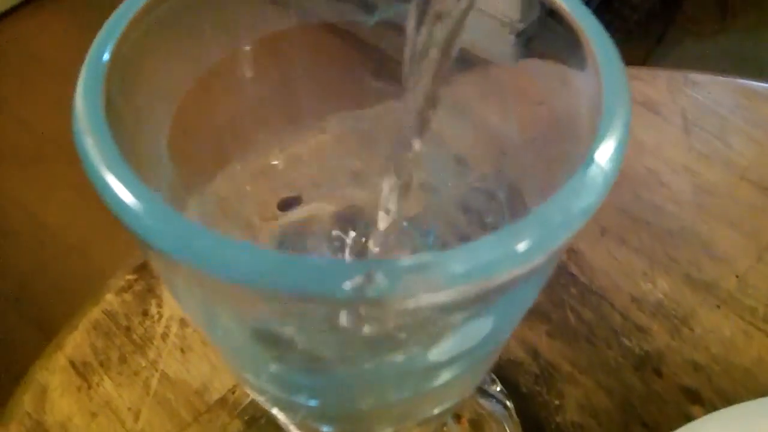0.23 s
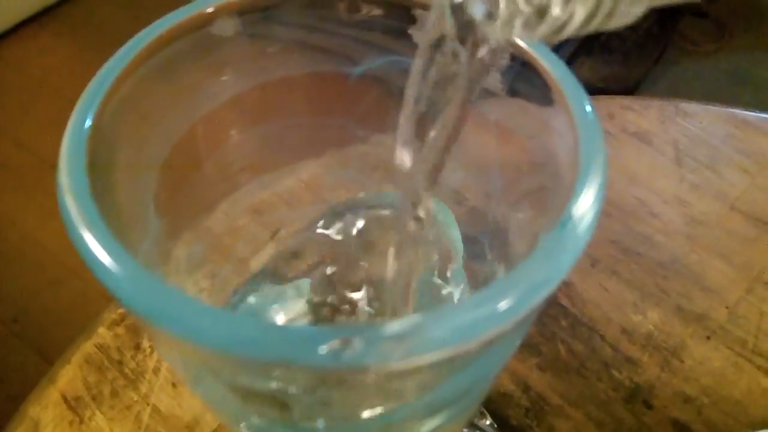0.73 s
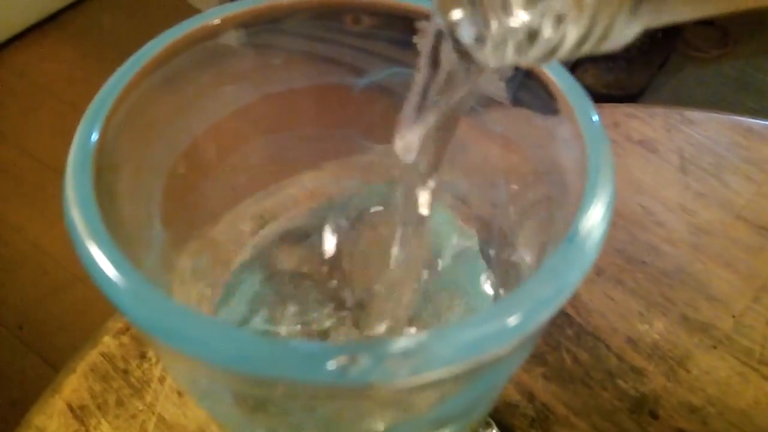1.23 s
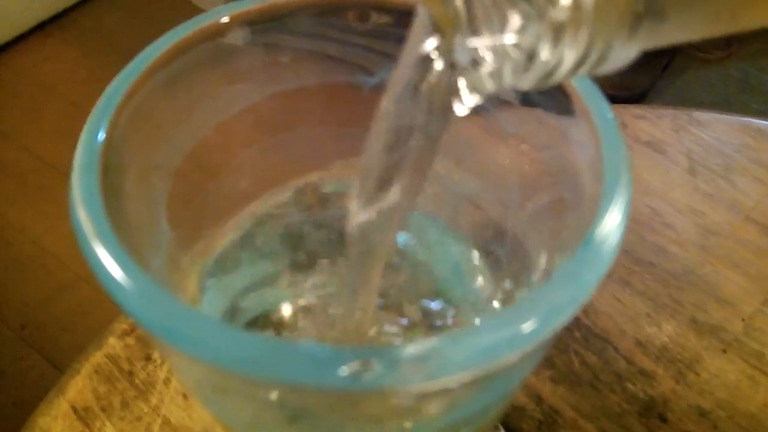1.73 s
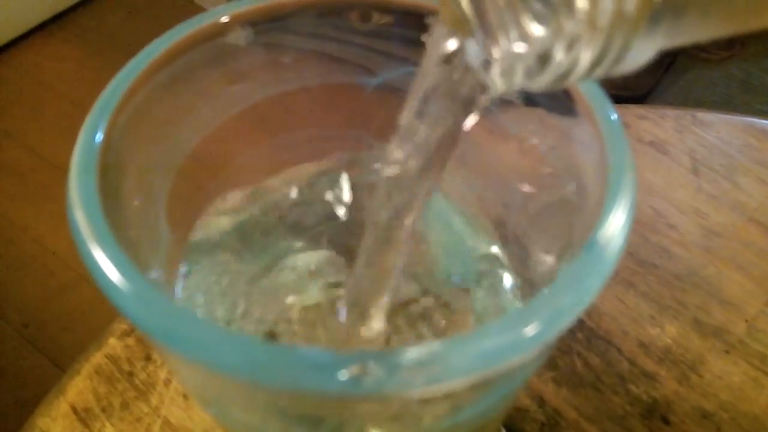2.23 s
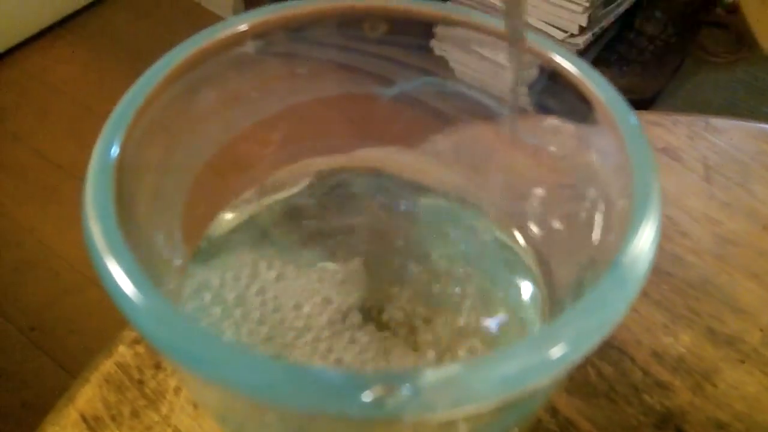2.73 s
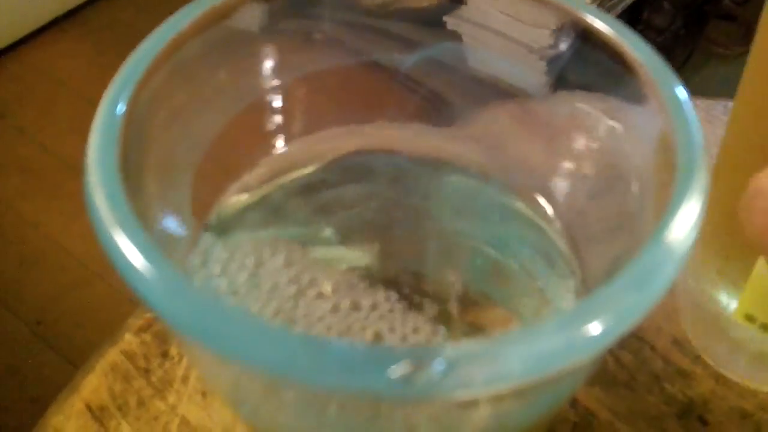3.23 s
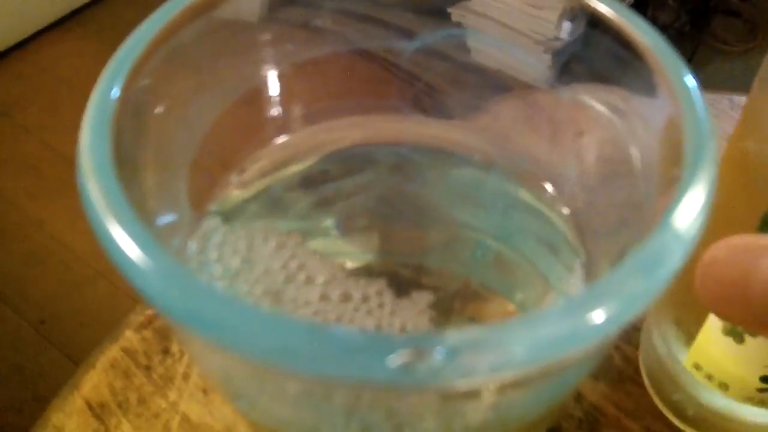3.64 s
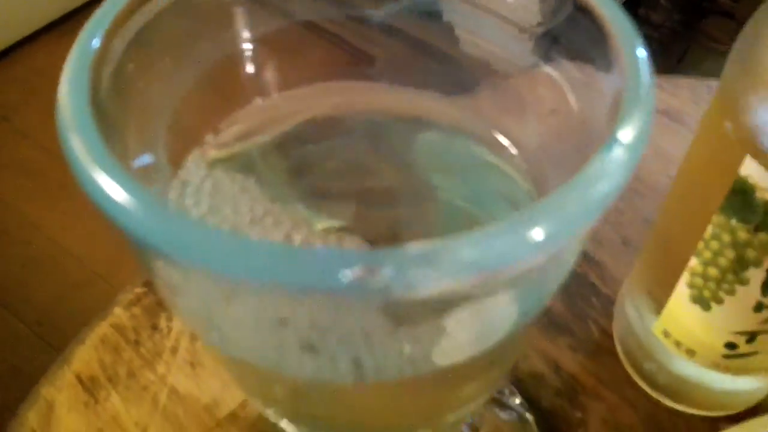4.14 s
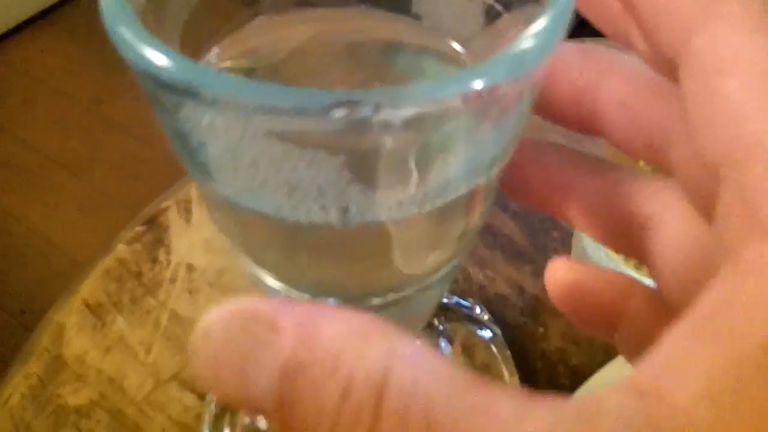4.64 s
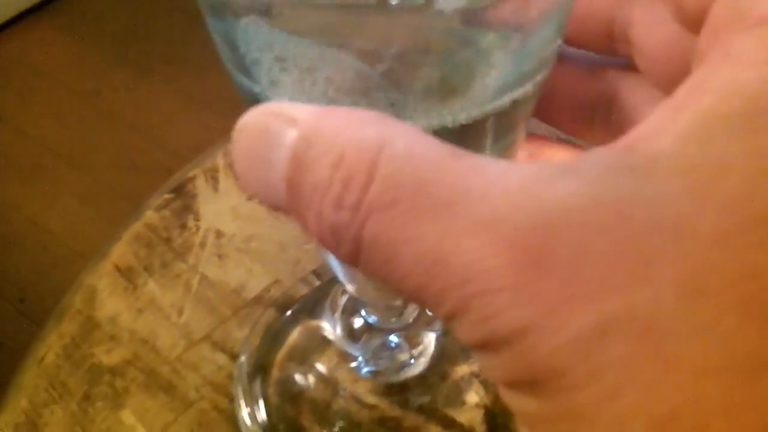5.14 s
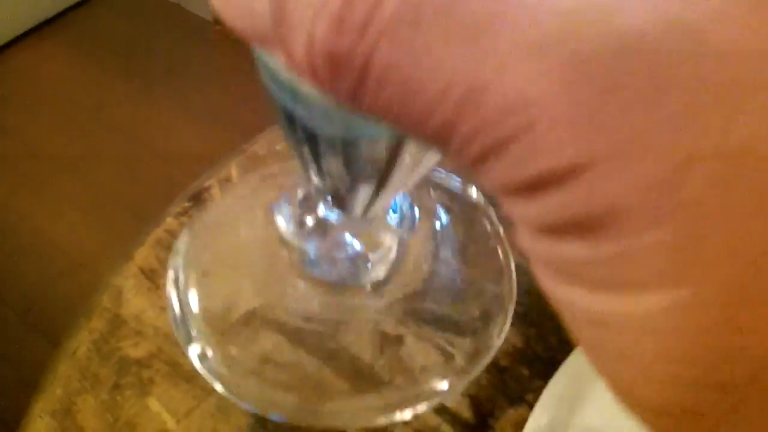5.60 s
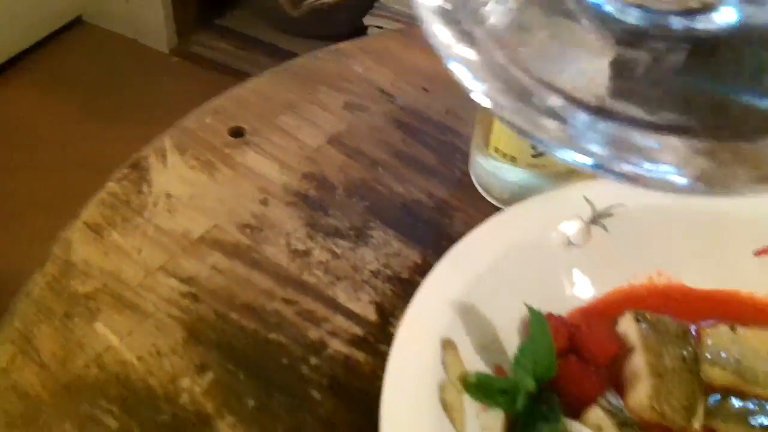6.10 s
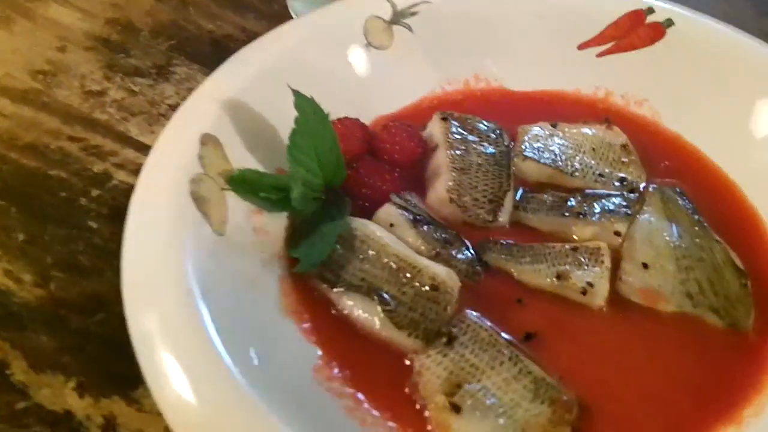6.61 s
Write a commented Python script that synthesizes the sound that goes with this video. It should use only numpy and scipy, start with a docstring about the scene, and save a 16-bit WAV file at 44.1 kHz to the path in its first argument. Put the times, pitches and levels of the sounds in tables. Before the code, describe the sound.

Wine glugs quickly from a bottle into a thick glass, bubbling and splashing close by, then the bottle knocks down on a wooden table.

```python
"""Air gulps up a bottle neck and bubbles plop and fizz as wine is poured into a thick stem glass, close by.
Plunges ring as gliding sines; fizz is random bubbles; both excite the bowl's air modes, and the deepest plunges
also ring the table under the stem. Gulps are rising tones in the neck, most begun by a pop; spray is short
bands of noise, small sounds are brief rings. Knocks ring the modes of a wooden table: the bottle is set down, a
hand takes the glass. Steady noise lies beneath."""
import sys
import numpy as np
from scipy import signal
from scipy.fft import rfft, irfft
from scipy.io import wavfile
from scipy.ndimage import uniform_filter1d

SR = 44100
rng = np.random.default_rng(int(sys.argv[2]) if len(sys.argv) > 2 else 0)


def transcribe(signal):
    """Save signal, clipped to [-1, 1], as a 16-bit WAV file at the path in sys.argv[1]."""
    frames = np.atleast_2d(signal).T
    limited = np.clip(frames, -1, 1)
    pcm = np.round(limited * 32767).astype(np.int16)
    wavfile.write(sys.argv[1], SR, pcm)


N = 302614


def gain_of(db):
    """Decibels to amplitude."""
    return 10 ** (np.asarray(db) / 20)


def evened(x):
    """Scales to rms 1."""
    return x / np.sqrt(np.mean(x ** 2) + 1e-20)


def smoothed_noise(length, width_samples):
    """Slow random curve of rms 1: white noise averaged twice."""
    once = uniform_filter1d(rng.standard_normal(length), size=width_samples)
    return evened(uniform_filter1d(once, size=width_samples))


def curve(rows):
    """Interpolates the columns of a time table at every sample."""
    time_s, *columns = np.transpose(rows)
    return [np.interp(np.arange(N) / SR, time_s, column) for column in columns]


def colour(x, points):
    """Filters by a spectrum of (f/Hz, gain/dB), interpolated over log frequency."""
    point_hz, point_db = np.transpose(points)
    hz = np.fft.rfftfreq(N, 1 / SR)
    gain_db = np.interp(np.log(hz + 1), np.log(point_hz), point_db)
    return irfft(rfft(x) * gain_of(gain_db), N)


def add(mix, start_s, sound):
    """Mixes a sound in at start_s, cut at the end of the mix."""
    part = mix[max(round(start_s * SR), 0):][:len(sound)]
    part += sound[:len(part)]


def ring(hz, t60_s, glide=0., rise_s=0.0001):
    """A dying sine; glide is the mean pitch rise over t60 as a share (twice that at t60)."""
    t = np.arange(round(min(t60_s, 1.5) * SR) + 9) / SR
    envelope = gain_of(-60 * t / t60_s) * (1 - np.exp(-t / rise_s))
    return envelope * np.sin(2 * np.pi * hz * t * (1 + glide * t / t60_s))


def puff(t60_s, rise_s=0.0001):
    """A dying burst of white noise."""
    t = np.arange(6000) / SR
    return rng.standard_normal(6000) * gain_of(-60 * t / t60_s) * (1 - np.exp(-t / rise_s))


def resonate(x, hz, width_hz):
    """Resonance of gain 1 at a pitch that may move: shift down to zero, smooth, shift back."""
    turn = np.exp(2j * np.pi * np.cumsum(hz * np.ones(len(x))) / SR)
    pole = np.exp(-np.pi * width_hz / SR)
    smooth = signal.lfilter([1 - pole], [1, -pole], x / turn)
    return 2 * (turn * smooth).real


# churn of the stream in the bowl: t/s, level/dB
STREAM_CHURN = [(0.0, -89), (0.14, -52.5), (0.28, -49.5), (0.44, -47), (0.99, -41.5), (1.14, -53.5),
                (1.23, -49), (1.29, -40), (1.4, -50), (1.5, -48.5), (2.15, -54.5), (2.41, -68),
                (2.95, -63.5)]
# air modes above the wine: t/s, first f/Hz, second f/Hz, gain of the first/dB
AIR_MODES = [(0, 1172, 2160, -7), (.35, 1210, 1537, 11), (.6, 948, 1216, 20), (.9, 798, 1481, 25),
             (1.2, 816, 1568, 28.5), (1.6, 800, 1600, 20), (2.3, 783, 1830, 17), (2.5, 918, 1780, 22),
             (2.9, 985, 1850, 21.5)]
# table modes under the stem: f/Hz, width/Hz, gain/dB
STEM_MODES = [(441.7, 17, 2.5), (610, 29, -10.5)]


def bowl():
    """Bubbles, splashes and fizz ring the air above the wine; the deepest bubbles also ring the table under the
    glass."""
    slosh_share = 0.033  # rms bend of the air modes by the rocking surface
    wash_db = -14.5      # hiss of bubbles too many to count, against the churn
    tail_db = -22        # share of the bubbles that lingers in the air of the bowl
    second_db = 13.5
    churn_db, = curve(STREAM_CHURN)
    first_hz, second_hz, first_db = curve(AIR_MODES)
    slosh = 1 + slosh_share * smoothed_noise(N, 2500)
    bubbles, splash = plops()

    # each plunge stirs the wine, 19 ms decay constant
    stir = signal.lfilter([1], [1, -np.exp(-1 / (0.019 * SR))], abs(bubbles))
    bursts = 0.2 + 1.5 * stir / (uniform_filter1d(stir, size=9000) + .02)
    births_on = np.arange(N) < 2.9 * SR
    wash = bursts * evened(colour(rng.standard_normal(N), FIZZ_SPECTRUM))
    drive = splash + gain_of(churn_db) * fizz(bursts * births_on)
    drive += gain_of(churn_db + wash_db) * wash

    push = drive + gain_of(tail_db) * bubbles
    air = gain_of(first_db) * resonate(push, first_hz * slosh, 21.4)
    air += gain_of(second_db) * resonate(push, second_hz * slosh, 45)

    # the deepest plunges press on the stem, more as the glass fills
    deep = resonate(resonate(bubbles, 870, 252), 870, 244)
    filling = np.minimum(np.arange(N) / (1.5 * SR), 1)
    thumps = abs(deep) ** 0.56 * filling
    stem = np.zeros(N)
    for hz, width_hz, db in STEM_MODES:
        narrowed = resonate(resonate(thumps, hz, 139), hz, 130)
        stem += gain_of(db) * resonate(narrowed, hz, width_hz)
    return bubbles + drive + air + stem


# plunges of the stream, levels before colouring: t/s, deep bubble level/dB, its f/Hz,
# middle bubble level/dB, its f/Hz, its t60/s, its mean pitch rise/share, small bubble level/dB, its f/Hz
STREAM_PLUNGES = [(0.065, -31.5, 1280, -35, 2290, 0.0078, 0.24, -12, 2820),
                  (0.076, -54, 1320, -47, 1780, 0.014, 0.15, -22.5, 3840),
                  (0.085, -56, 1230, -48, 1990, 0.018, 0.02, -24.5, 3720),
                  (0.09, -58, 1160, -44, 2280, 0.019, 0.25, -18, 3030),
                  (0.1015, -53, 1360, -32, 2060, 0.048, 0.4, -17.5, 3800),
                  (0.198, -61, 1040, -45, 2240, 0.014, 0.3, -34, 3710),
                  (0.2087, -53, 1320, -33, 1870, 0.027, 0.045, -26, 2940),
                  (0.226, -57, 1297, -19, 1770, 0.012, 0.02, -28.5, 5680),
                  (0.234, -51, 1300, -13.5, 2150, 0.0039, 0.02, -32.5, 2450),
                  (0.2852, -32, 1260, -9.5, 2200, 0.0055, 0.23, -13.5, 2930),
                  (0.3119, -20, 1330, -15, 2230, 0.039, 0.06, -14, 3350),
                  (0.3222, -47, 1120, -2.5, 1540, 0.018, 0.026, -23, 2370),
                  (0.351, -21, 1230, -23, 1332, 0.1, 0.024, -17, 3360),
                  (0.365, -16.5, 1130, -21.5, 1844, 0.05, 0.13, -25.5, 3450),
                  (0.373, -42, 1220, -18.5, 1246, 0.025, 0.02, -34, 2320),
                  (0.4126, -48, 1200, -40, 1245, 0.26, 0.034, -20.5, 4210),
                  (0.431, -8, 1264, -13.5, 1312, 0.074, 0.013, -27, 3500),
                  (0.473, -52, 1150, -14.5, 1406, 0.035, 0.022, -30, 2320),
                  (0.485, -59, 1150, -13.5, 1390, 0.027, 0.056, -20.5, 2840),
                  (0.5, -47, 1120, -6.5, 1344, 0.031, 0.013, -46, 4360),
                  (0.518, -33, 1070, -23, 1220, 0.012, 0.02, -9.5, 3090),
                  (0.527, -16, 1136, -40, 1200, 0.065, 0.02, -40, 3700),
                  (0.543, -40, 1140, -6.5, 1194, 0.046, 0.45, -11.5, 2740),
                  (0.565, -11.5, 1060, -5, 1250, 0.014, 0.23, -13.5, 3020),
                  (0.579, -37, 955, -10, 1145, 0.032, 0.087, -31, 2300),
                  (0.595, -16, 910, -7.5, 1330, 0.0076, 0.13, -20, 2950),
                  (0.635, -16, 860, -16, 1440, 0.029, 0.022, -36, 2450),
                  (0.647, -27, 810, -29, 1350, 0.098, 0.02, -38, 2810),
                  (0.675, -31, 910, -24.5, 1526, 0.041, 0.02, -47, 3040),
                  (0.713, -21.5, 1070, -26, 1880, 0.039, 0.059, -22.5, 2950),
                  (0.726, -30, 1030, -22, 1350, 0.028, 0.27, -37, 2930),
                  (0.743, -25, 1080, -17, 1870, 0.0099, 0.02, -32, 2620),
                  (0.749, -20.5, 1110, -14, 1760, 0.013, 0.24, -41, 3910),
                  (0.766, -27, 910, -13.5, 1360, 0.017, 0.27, -28, 3340),
                  (0.774, -45, 860, -34, 2100, 0.01, 0.3, -14.5, 3100),
                  (0.7948, -19, 936, -16, 1230, 0.017, 0.24, -27, 2590),
                  (0.819, -35, 970, -36, 1560, 0.066, 0.02, -25, 3700),
                  (0.826, -24, 936, -23.5, 1320, 0.033, 0.25, -23.5, 2330),
                  (0.847, -38, 960, -28, 1780, 0.013, 0.02, -21.5, 3770),
                  (0.861, -14.5, 912, -13.5, 1703, 0.03, 0.113, -19.5, 2460),
                  (0.87, -26, 854, -45, 1710, 0.057, 0.37, -19.5, 3420),
                  (0.885, -25, 820, -10, 1290, 0.0053, 0.14, -24.5, 2470),
                  (0.9163, -43, 855, -26, 2110, 0.011, 0.02, -20.5, 2890),
                  (0.927, -32.5, 800, -27, 1580, 0.021, 0.02, -25.5, 2720),
                  (0.948, -36, 790, -20, 1470, 0.021, 0.018, -24.5, 4430),
                  (0.984, -21.5, 806, -14, 1340, 0.014, 0.2, -22.5, 3940),
                  (1.03, -10.5, 908, 0, 1527, 0.025, 0.017, -20, 2340),
                  (1.047, -24, 900, -24, 1500, 0.044, 0.061, -43, 2500),
                  (1.0985, -33.5, 850, -30, 1670, 0.092, 0.13, -34, 2300),
                  (1.132, -34, 980, -20.5, 1470, 0.048, 0.072, -37, 2580),
                  (1.155, -42, 794, -22, 1580, 0.049, 0.12, -20, 3720),
                  (1.1982, -25.5, 760, -13.5, 1375, 0.031, 0.012, -23.5, 3730),
                  (1.2812, -14, 897, -1, 1250, 0.0053, 0.21, -28, 3030),
                  (1.298, -20, 807, -21, 1670, 0.013, 0.018, -29.5, 3820),
                  (1.32, -25, 816, -27.5, 1456, 0.029, 0.017, -41, 2490),
                  (1.3704, -48, 784, -49, 1460, 0.061, 0.19, -16.5, 3090),
                  (1.3911, -25, 890, -17.5, 1573, 0.036, 0.02, -25, 3620),
                  (1.402, -30, 844, -31, 1547, 0.077, 0.02, -22.5, 3010),
                  (1.426, -43, 810, -22, 1900, 0.02, 0.02, -36, 2840),
                  (1.435, -49, 840, -31, 1430, 0.078, 0.022, -25.5, 5430),
                  (1.459, -35.5, 880, -24, 1750, 0.024, 0.018, -29, 2430),
                  (1.5, -53, 880, -20, 2160, 0.0047, 0.02, -29, 3280),
                  (1.516, -39, 863, -33, 1614, 0.077, 0.041, -33, 6000),
                  (1.533, -40, 870, -23, 1660, 0.022, 0.19, -33, 4950),
                  (1.556, -45, 900, -30, 1580, 0.021, 0.02, -48, 3370),
                  (1.571, -30, 990, -29, 2300, 0.033, 0.96, -28.5, 2400),
                  (1.5861, -14, 956, -5, 1510, 0.0085, 0.02, -24.5, 2940),
                  (1.604, -24, 835, -10.5, 1600, 0.0051, 0.35, -33, 2320),
                  (1.62, -34, 770, -33, 1840, 0.017, 0.02, -25, 2790),
                  (1.6462, -26.5, 800, -20.5, 1850, 0.018, 0.085, -29.5, 3530),
                  (1.679, -32, 820, -32.5, 1460, 0.037, 0.018, -27, 3270),
                  (1.702, -37, 850, -28.5, 1455, 0.053, 0.02, -48, 3520),
                  (1.7197, -44, 830, -41, 1540, 0.03, 0.043, -27.5, 3740),
                  (1.7277, -39, 820, -27.5, 1560, 0.038, 0.02, -41, 2290),
                  (1.745, -39, 770, -30, 1650, 0.0082, 0.32, -27.5, 2380),
                  (1.762, -46, 775, -24.5, 1800, 0.03, 0.51, -34, 2230),
                  (1.7682, -33, 733, -45, 1980, 0.045, 0.15, -25, 2940),
                  (1.8036, -69, 784, -19.5, 1786, 0.025, 0.016, -26, 5940),
                  (1.829, -48, 770, -50, 1980, 0.011, 0.3, -35, 4120),
                  (1.848, -55, 990, -23.5, 1550, 0.011, 0.19, -31.5, 2340),
                  (1.887, -39, 770, -20, 2190, 0.023, 0.024, -32, 2760),
                  (1.9072, -43, 815, -29, 1820, 0.029, 0.02, -40, 3170),
                  (1.924, -26.5, 810, -18, 1356, 0.033, 0.018, -30, 2450),
                  (1.941, -37, 830, -18.5, 1700, 0.011, 0.14, -52, 2380),
                  (1.9902, -30, 800, -23, 2010, 0.018, 0.02, -29, 2790),
                  (2.008, -39, 770, -48.5, 1800, 0.083, 0.32, -30.5, 5100),
                  (2.039, -39.5, 690, -26.5, 1740, 0.072, 0.18, -38, 4560),
                  (2.083, -42, 870, -37, 1510, 0.039, 0.03, -27.5, 3570),
                  (2.092, -33.5, 770, -12, 1500, 0.0041, 0.17, -29.5, 2400),
                  (2.133, -37, 700, -28.5, 1388, 0.056, 0.046, -26.5, 2590),
                  (2.145, -57, 735, -34, 1895, 0.15, 0.013, -38.5, 2320),
                  (2.159, -37, 696, -40, 1700, 0.046, 0.02, -47, 2300),
                  (2.171, -33, 805, -14, 1700, 0.026, 0.016, -25, 2270),
                  (2.1825, -62, 730, -28.5, 1330, 0.04, 0.29, -38, 2290),
                  (2.184, -31.5, 694, -26.5, 1610, 0.037, 0.02, -26, 2160),
                  (2.2036, -37, 765, -27.5, 1490, 0.035, 0.02, -32.5, 2280),
                  (2.2313, -41, 777, -27, 1850, 0.027, 0.05, -52, 2930),
                  (2.2641, -42, 790, -21, 1970, 0.0084, 0.15, -37, 2450),
                  (2.2953, -44, 810, -26.5, 1760, 0.032, 0.05, -31, 3800),
                  (2.3142, -34, 800, -13, 1950, 0.0052, 0.042, -26, 4280),
                  (2.363, -50, 800, -34, 2320, 0.0083, 0.15, -32.5, 3650),
                  (2.408, -27, 870, -28, 1495, 0.031, 0.02, -24, 2530),
                  (2.498, -31.5, 943, -22.5, 1840, 0.027, 0.014, -27.5, 2440),
                  (2.511, -52, 1000, -32, 1880, 0.03, 0.17, -31, 3900),
                  (2.529, -59, 930, -32, 1840, 0.018, 0.02, -31.5, 2970),
                  (2.58, -41.5, 930, -23, 2190, 0.0072, 0.28, -40, 3880),
                  (2.639, -48, 930, -40, 2300, 0.016, 0.05, -38, 2810),
                  (2.672, -56, 960, -32, 1786, 0.032, 0.02, -29.5, 2750),
                  (2.734, -37.5, 980, -30, 1890, 0.028, 0.02, -27.5, 2600),
                  (2.841, -36, 1180, -23, 1960, 0.023, 0.05, -33, 2970),
                  (2.848, -53, 1190, -33.5, 2410, 0.024, 0.31, -38, 4650),
                  (2.857, -26.5, 1233, -9, 1874, 0.026, 0.012, -40, 2300)]
# spectrum of small bubbles and spray: f/Hz, relative level/dB
FIZZ_SPECTRUM = [(600, -46), (900, -6.5), (1500, 6), (2500, 10.5), (3500, 16.5), (4500, 6.5), (6500, 4),
                 (11000, -21)]


def plops():
    """Each plunge rings a deep, a middle and a small bubble and three strays, and throws a little spray."""
    deep_t60_s = 0.036
    small_cycles, small_glide = 38.2, 0.062  # t60 in cycles; mean pitch rise
    swell_share = 0.025  # rise time of the middle bubble against its t60, within limits
    stray_db, stray_spread_db, stray_top_db = -15, 4.5, -20.5  # top caps the plunge level that strays follow
    stray_cycles, stray_lag_s = 45, 0.01  # t60 in cycles; longest lag
    stray_low_hz, stray_high_hz, stray_glide = 1252, 4487, 0.264  # glide: greatest mean pitch rise
    bubbles, splash = np.zeros(N), np.zeros(N)
    spreads = rng.standard_normal(len(STREAM_PLUNGES))
    stray_draws = rng.random((len(STREAM_PLUNGES), 3, 4))
    for row, spread, strays in zip(STREAM_PLUNGES, spreads, stray_draws):
        s, deep_db, deep_hz, middle_db, middle_hz, t60_s, glide, small_db, small_hz = row
        swell_s = np.clip(swell_share * t60_s, .0006, .0018)
        middle = ring(middle_hz, t60_s, glide, rise_s=swell_s)
        small = ring(small_hz, small_cycles / small_hz, small_glide, rise_s=0.00041)
        deep = ring(deep_hz, deep_t60_s, rise_s=0.00079)
        add(bubbles, s, gain_of(middle_db) * middle)
        add(bubbles, s, gain_of(small_db) * small)
        add(bubbles, s, gain_of(deep_db) * deep)

        loudest_db = min(max(middle_db, small_db), stray_top_db)
        for lag, size, strength, climb in strays:
            hz = stray_low_hz * (stray_high_hz / stray_low_hz) ** size
            db = loudest_db + stray_db + stray_spread_db * (2 * strength - 1)
            stray = ring(hz, stray_cycles / hz, stray_glide * climb ** 2, rise_s=0.00017)
            add(bubbles, s + lag * stray_lag_s, gain_of(db) * stray)

        add(splash, s, gain_of(small_db - 21 + 5.4 * spread.clip(-2, 2)) * puff(0.018))
        add(splash, s, gain_of(middle_db - 24) * puff(0.012))
    # a small bubble radiates little bass
    bubbles = colour(bubbles, [(300, -8.0), (650, -7.0), (20000, 18.0)])
    return bubbles, colour(splash, FIZZ_SPECTRUM)


def fizz(bursts):
    """Many small random bubbles in 30 pitches, born mostly in the bursts, a few of them large."""
    point_hz, point_db = np.transpose(FIZZ_SPECTRUM)
    out = np.zeros(N)
    for hz in np.geomspace(950, 9000, num=30):
        born = rng.random(N) < 45 * bursts / SR  # 45 births/s per pitch at bursts = 1
        births = born * gain_of(3.8 * rng.exponential(1, N).clip(0, 4))
        bubble = ring(hz, 46 / hz, glide=.3 * rng.random() ** 2, rise_s=.0005)
        db = np.interp(np.log(hz), np.log(point_hz), point_db)
        out += gain_of(db) * signal.oaconvolve(births, bubble)[:N]
    return out / np.std(out[:3 * SR])


# gulps, an air pocket in the neck shrinks and bursts: start t/s, burst t/s, low f/Hz, top f/Hz,
# rise time/s, opening level/dB, level at the top f/dB, slope/dB per octave (levels rms, before the fades)
NECK_GULPS = [(0.0, 0.056, 49.7, 454, 0.032, -57.5, -32.5, 8),
              (0.065, 0.273, 61.2, 299, 0.033, -41, -36, 10),
              (0.285, 0.515, 44.2, 211, 0.065, -43, -44.5, 7.5),
              (0.523, 0.741, 49.1, 278, 0.029, -43, -31.5, 13),
              (0.784, 0.982, 42.3, 322, 0.028, -66, -21.5, 17),
              (1.048, 1.253, 38, 319, 0.022, -43, -19.5, 15), (1.383, 1.556, 36, 267, 0.022, -71, -35, 9)]
# pops as the neck opens: t/s, level/dB, treble against it/dB
NECK_POPS = [(0.063, -26.5, -30), (0.286, -26.5, -3), (0.518, -27.5, -18), (0.774, -31, -16),
             (1.046, -32.5, -7.5), (1.369, -35.5, 0)]


def neck():
    """Shrinking air pockets sound rising notes; one-cycle pops mark the starts of all but the first."""
    open_t60_s = 0.1  # opening thud
    burst_s, burst_db = 0.031, -30  # fade just before the burst
    out = np.zeros(N)
    for start_s, end_s, low_hz, top_hz, rise_s, open_db, peak_db, octave_db in NECK_GULPS:
        t = np.arange(0, end_s - start_s, 1 / SR)
        left = t[::-1]
        hz = low_hz + (top_hz - low_hz) / (1 + (left / rise_s) ** 2)
        fade_db = burst_db * np.maximum(1 - left / burst_s, 0) ** 2
        swell = gain_of(peak_db + octave_db * np.log2(hz / top_hz) + fade_db)
        level = swell + gain_of(open_db - 60 * t / open_t60_s)
        tone = np.sqrt(2) * np.sin(2 * np.pi * np.cumsum(hz) / SR)
        add(out, start_s, level * tone * signal.windows.tukey(len(t), .1))
    u = np.arange(-150, 150) / SR
    cycle = 1.95 * u / 0.00075 * np.exp(-(u / 0.00045) ** 2 / 2)
    for s, db, treble_db in NECK_POPS:
        add(out, s - .003, gain_of(db) * cycle)
        add(out, s, gain_of(db + treble_db) * puff(0.0041))
    return out


# fine spray spitting off the stream: t/s, peak level/dB, f/Hz
STREAM_SPRAY = [(0.051, -34, 5470), (0.0646, -29, 6200), (0.0643, -39, 10560), (0.203, -41, 5570),
                (0.225, -29.5, 11500), (0.268, -29, 8900), (0.2843, -26, 6330), (0.3518, -25, 9250),
                (0.365, -31, 6350), (0.4304, -37, 11300), (0.5177, -23.5, 6740), (0.5926, -28, 6100),
                (0.593, -34.5, 11150), (0.718, -22, 5360), (0.765, -31, 11550), (0.8163, -24.5, 6500),
                (0.917, -25.5, 5530), (0.9828, -27.5, 5800), (1.0016, -35, 11400), (1.0271, -24, 6150),
                (1.0455, -33, 11500), (1.0997, -24, 6100), (1.134, -37, 11200), (1.1984, -23, 5900),
                (1.2815, -35, 11100), (1.388, -32.5, 11400), (1.392, -28.5, 6450), (1.5847, -35, 10800),
                (1.5866, -36, 6240), (1.6038, -32, 11400), (1.889, -35, 6970), (2.091, -30, 5730),
                (2.2635, -32, 4830), (2.3628, -35, 6030), (2.4074, -33, 5040), (2.498, -45, 4930),
                (2.6694, -36, 4830), (2.8479, -21.5, 5300)]


def spray():
    """Each spit is a short hiss around one high pitch."""
    out = np.zeros(N)
    for s, db, hz in STREAM_SPRAY:
        spit = resonate(puff(0.006, rise_s=0.00089), hz, width_hz=460)
        add(out, s, gain_of(db) * spit / abs(spit).max())
    return out


# blows on the table top: t/s, level/dB, lowest f/Hz, highest f/Hz, ring time factor/per kHz,
# free ring/s, clatter against the level/dB, tick against the level/dB
TABLE_BLOWS = [(2.846, -39, 397, 480, 0.92, 0.075, -6, -45), (3.6409, -17, 60.7, 880, 0.84, 0.086, -2, -16),
               (3.667, -30, 101, 2000, 0.56, 0.066, -10, -18),
               (4.8318, -37, 504, 2500, 1.02, 0.071, -4.5, 15.5)]
# modes of the wooden top: f/Hz, level/dB, t60/s before the blow's ring time factor
TABLE_MODES = [(66, -12, 0.28), (101, -17, 0.29), (159, -9, 0.31), (202, -17.5, 0.4), (269, -21, 0.42),
               (442, 6.5, 0.28), (497, 4, 0.073), (578, 2.5, 0.099), (653, 4, 0.061), (789, 2, 0.095),
               (957, 5.5, 0.053), (1072, 2, 0.05), (1630, -6, 0.089), (1990, 6, 0.035), (2280, -1.5, 0.095),
               (3074, 5, 0.07)]


def table():
    """Each blow rings the same modes; a soft one spares the high, a light one the low, which build up late."""
    blow_s, flip_hz = 0.00086, 1500  # shortest build-up; modes above flip_hz start the other way
    choke_t60_s = 0.07  # extra decay once the weight rests on the top
    wobble = 0.12       # rms unevenness of each ring from the rattling contact
    out, clatter, tick = np.zeros((3, N))
    for s, db, low_hz, high_hz, damping, free_s, clatter_db, tick_db in TABLE_BLOWS:
        for hz, mode_db, t60_s in TABLE_MODES:
            share = np.sign(flip_hz - hz) / (1 + (hz / high_hz) ** 2) / (1 + (low_hz / hz) ** 4)
            build_s = np.clip((55 / hz) ** 3.6, blow_s, .02)
            mode = share * ring(hz, t60_s * damping ** (hz / 1000), rise_s=build_s)
            uneven = 1 + wobble * smoothed_noise(len(mode), 300)
            late_s = np.maximum(np.arange(len(mode)) / SR - free_s, 0)
            level = gain_of(db + mode_db - 60 * late_s / choke_t60_s)
            add(out, s, level * mode * uneven)
        add(clatter, s, gain_of(db + clatter_db) * puff(0.16, rise_s=0.0004))
        add(tick, s, gain_of(db + tick_db) * puff(0.014))
    clatter = colour(clatter, [(60, -27), (200, 7.5), (650, 7.0), (2000, 2.0), (3500, -6.5), (8000, -33.0)])
    tick = colour(tick, [(400, -41), (900, -16), (3000, 7.0), (5000, -1.0), (9000, -17.0)])
    return out + clatter + tick


# rings of the glass, and of the bottle as it is set down: t/s, level/dB, f/Hz, t60/s
GLASS_RINGS = [(2.175, -48, 3750, 0.36), (2.266, -41, 3750, 0.33), (2.411, -37, 3780, 0.074),
               (2.1, -45, 3720, 0.18), (2.839, -43, 3780, 0.1), (2.857, -53, 3800, 0.2),
               (3.65, -21.5, 1990, 0.09), (3.652, -30, 2040, 0.16), (3.661, -69, 1250, 2.6),
               (3.662, -50, 1030, 0.4), (3.97, -47.5, 2980, 0.45), (4.924, -54, 3760, 0.12),
               (5.278, -56, 3780, 0.091), (6.357, -53, 2290, 0.7), (6.357, -50, 2210, 0.08),
               (6.359, -36, 3700, 0.041)]
# brief small bubbles and drips of the pour, later faint ticks: t/s, level/dB, f/Hz
DRIPS_AND_TICKS = [(0.166, -34.5, 2380), (0.2575, -22.5, 3530), (0.2783, -27, 2950), (0.395, -21, 3700),
                   (0.398, -31, 5200), (0.44, -21.5, 3700), (0.466, -26, 2500), (0.622, -21, 3700),
                   (0.697, -30, 2340), (0.853, -30, 3000), (1.003, -28, 3600), (1.051, -28, 3100),
                   (1.1045, -18, 3340), (1.113, -22, 3670), (1.168, -21, 5300), (1.1764, -12.5, 5640),
                   (1.448, -22, 4130), (1.919, -24, 5120), (1.964, -24, 4200), (2.689, -28.5, 4300),
                   (1.254, -29, 3680), (1.588, -19.5, 3660), (1.616, -28, 3100), (1.631, -28, 3900),
                   (1.687, -31, 3880), (1.977, -30, 2630), (2.016, -30, 2770), (2.057, -33, 2430),
                   (2.128, -22, 2300), (2.438, -31.5, 2460), (2.5735, -41, 2460), (2.6127, -33, 3900),
                   (2.7194, -30, 2900), (2.796, -41, 4130), (2.8307, -28, 4500), (2.83, -41, 1920),
                   (2.838, -30, 3000), (2.9856, -48, 4250), (3.3099, -45, 4480), (3.4106, -40, 6700),
                   (3.6065, -39, 6000), (3.916, -41, 4370), (4.252, -46, 3050), (5.768, -45, 1820),
                   (5.769, -43, 3400), (6.356, -52, 1400), (6.356, -42, 2600), (6.357, -33.5, 3420),
                   (6.357, -42, 4470)]


def small_sounds():
    """Glass rings are dying sines of set t60; drips and ticks are a few cycles and a crackle."""
    out = np.zeros(N)
    for s, db, hz, t60_s in GLASS_RINGS:
        add(out, s, gain_of(db) * ring(hz, t60_s, rise_s=0.00062))
    for s, db, hz in DRIPS_AND_TICKS:
        add(out, s, gain_of(db) * ring(hz, 32 / hz, 0.043, rise_s=0.000098))
        add(out, s, gain_of(db - 27.5) * np.diff(puff(0.009)))
    return out


def room(x):
    """Reflections: a short tail of sparse taps of random sign, 49 ms t60."""
    t = np.arange(9000) / SR
    present = (rng.random(9000) < .05) * (t > .003)
    taps = rng.choice([-1., 1.], 9000) * present * gain_of(-60 * t / 0.049)
    return signal.oaconvolve(x, taps / np.linalg.norm(taps))[:N]


# spectrum of the room and amplifier noise: f/Hz, relative level/dB per Hz
NOISE_SPECTRUM = [(28, -4), (50, 4), (75, -3), (250, -5.5), (450, -6.5), (900, -9), (2500, -10.5),
                  (4300, -9.5), (6000, -17), (12000, -14)]
# its rms level: t/s, level/dB
NOISE_LEVEL = [(0, -52), (3, -53.5), (5.6, -53.5), (6.1, -52.5), (6.4, -51.5), (6.86, -53)]


def background():
    """Room and amplifier noise: coloured white noise at a slowly drifting level."""
    level_db, = curve(NOISE_LEVEL)
    return gain_of(level_db) * evened(colour(rng.standard_normal(N), NOISE_SPECTRUM))


def scene():
    """Sums the sources, the reflections of all but the neck, and the noise."""
    near = bowl() + spray() + table() + small_sounds()
    reflections = gain_of(-13.5) * room(near)
    return (near + reflections + neck() + background())[None]


# microphone response: f/Hz, gain/dB
MIC_RESPONSE = [(20, 1.5), (5500, -1), (6900, -0.5), (7700, -13.5), (8700, -6), (11300, -3), (12000, -9.5),
                (13000, -59)]


def record(dry):
    """The small microphone dips in the treble; a steep low-pass then limits the band."""
    edge_hz = 13100
    heard = colour(dry[0], MIC_RESPONSE)[None]
    low_pass = signal.firwin(511, edge_hz, window=("kaiser", 9), fs=SR)
    return signal.oaconvolve(heard, low_pass[None], "same")


dry = scene()
out = record(dry)
transcribe(out)
```